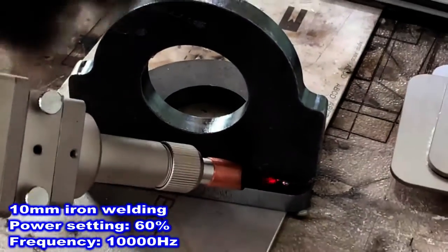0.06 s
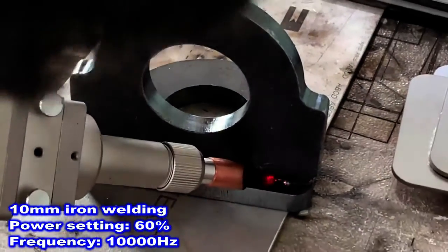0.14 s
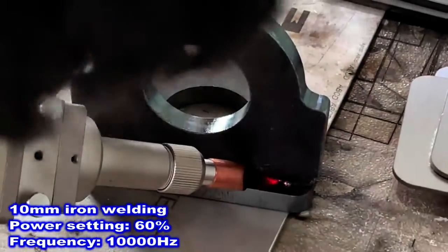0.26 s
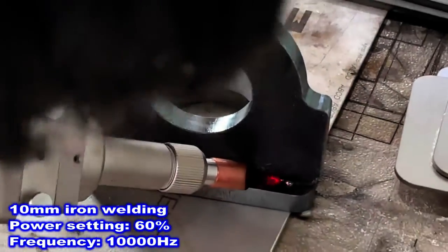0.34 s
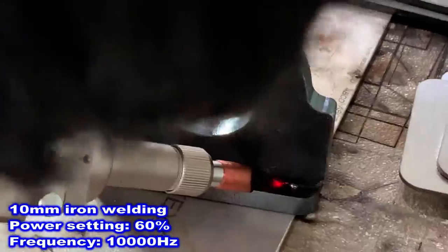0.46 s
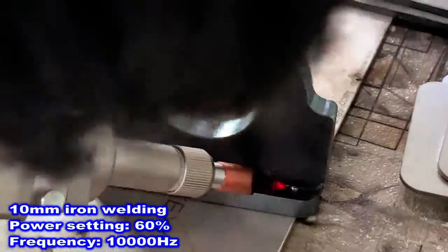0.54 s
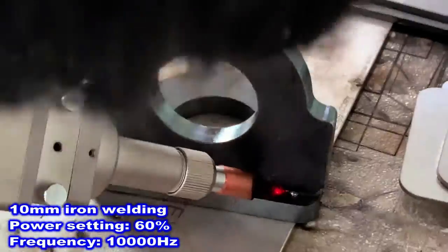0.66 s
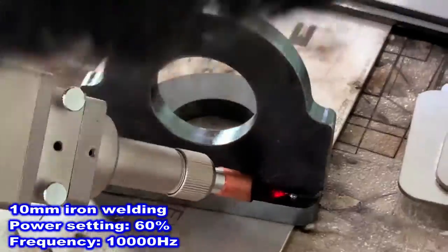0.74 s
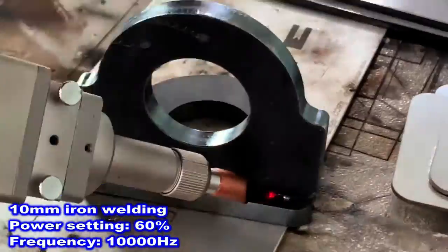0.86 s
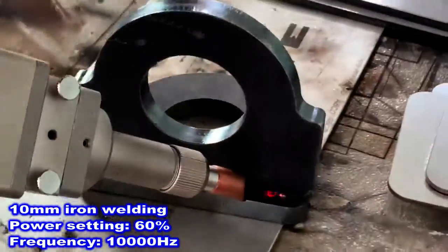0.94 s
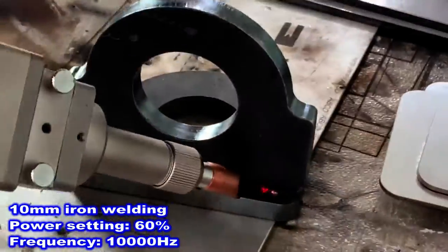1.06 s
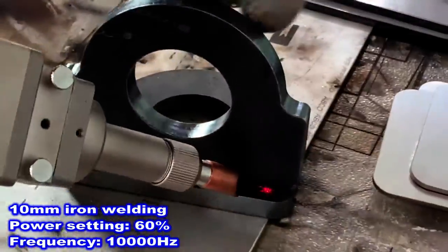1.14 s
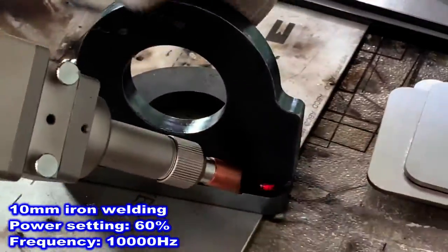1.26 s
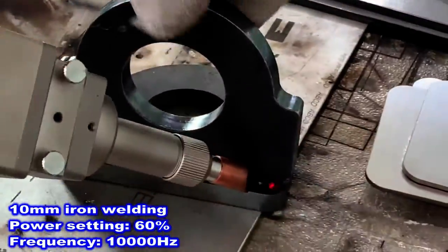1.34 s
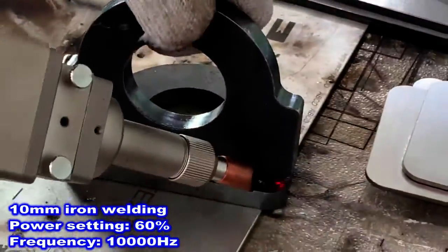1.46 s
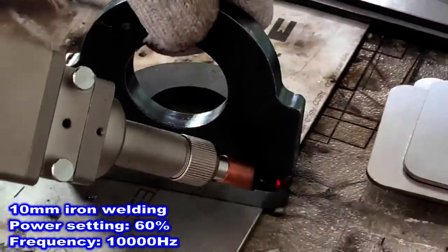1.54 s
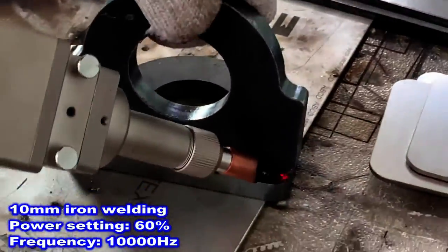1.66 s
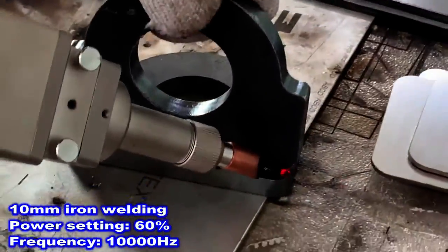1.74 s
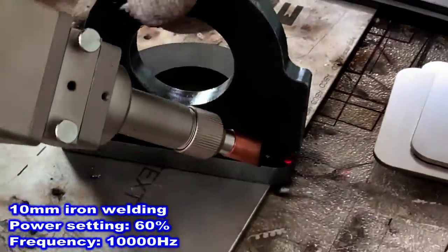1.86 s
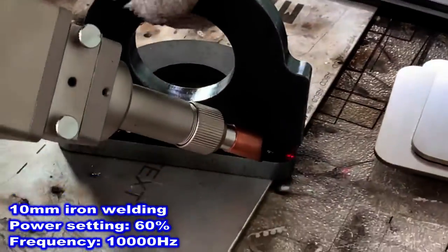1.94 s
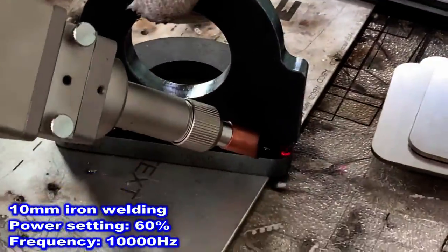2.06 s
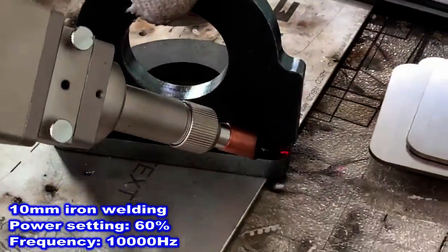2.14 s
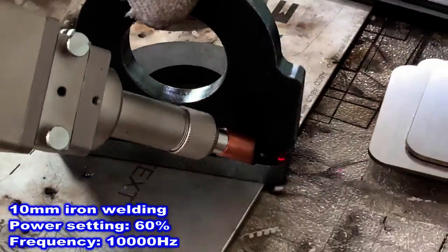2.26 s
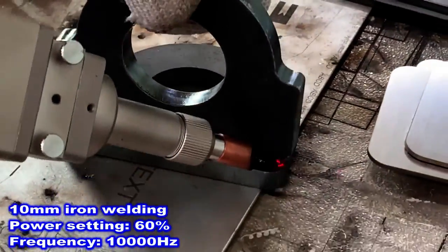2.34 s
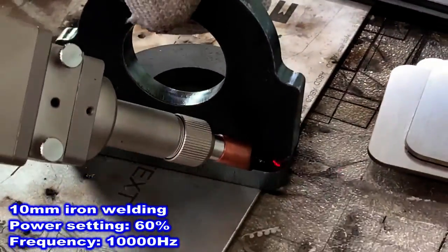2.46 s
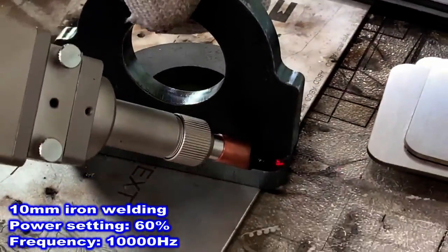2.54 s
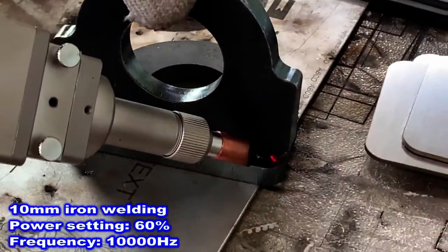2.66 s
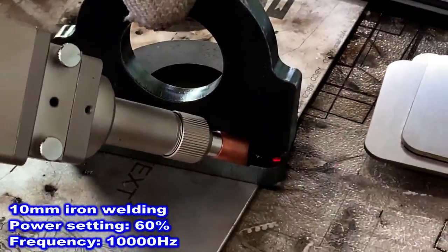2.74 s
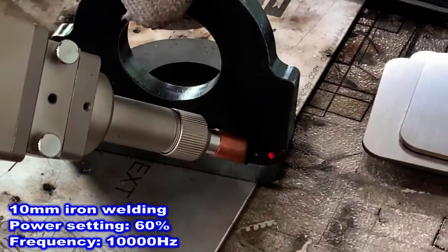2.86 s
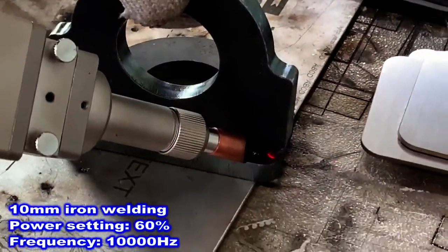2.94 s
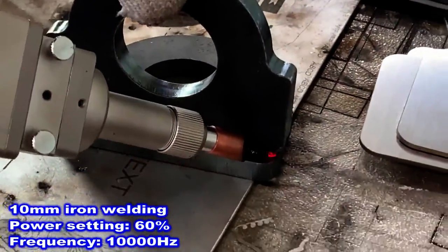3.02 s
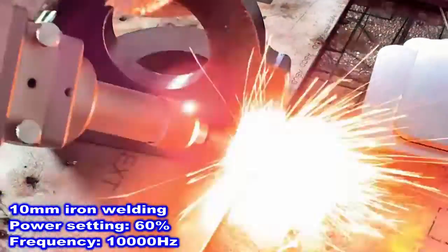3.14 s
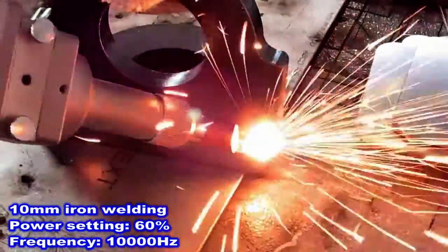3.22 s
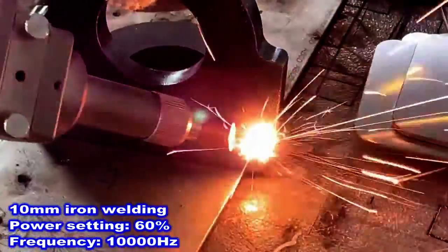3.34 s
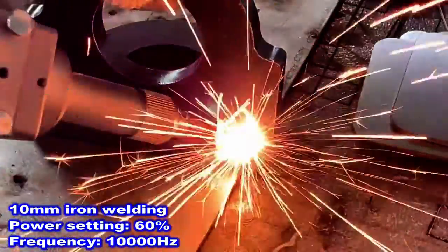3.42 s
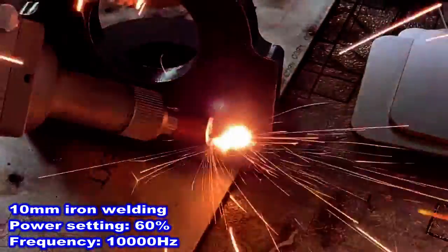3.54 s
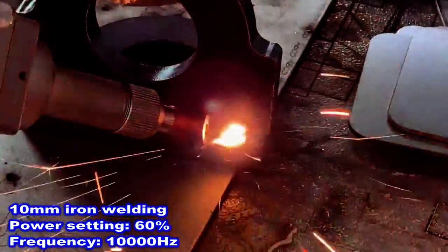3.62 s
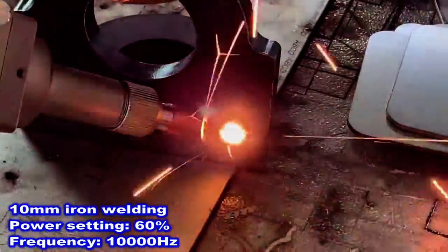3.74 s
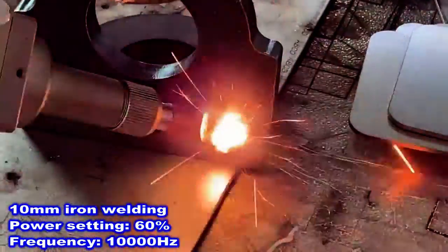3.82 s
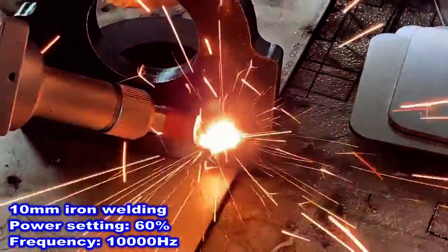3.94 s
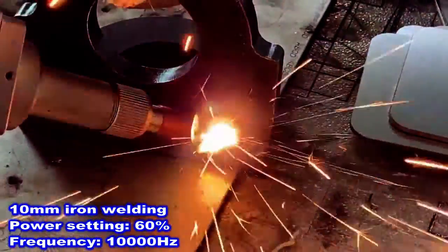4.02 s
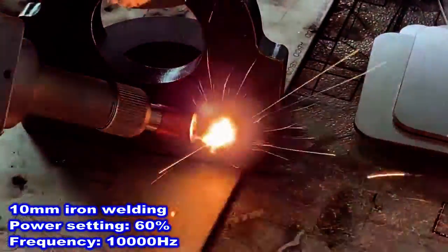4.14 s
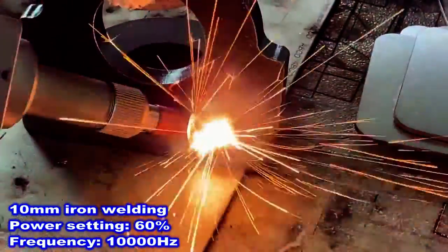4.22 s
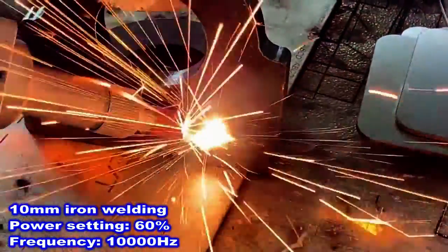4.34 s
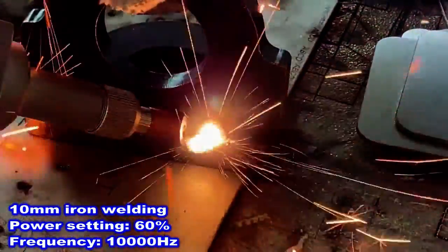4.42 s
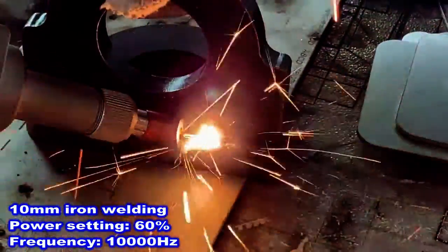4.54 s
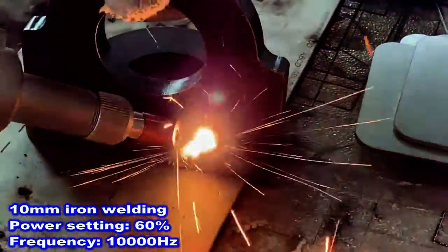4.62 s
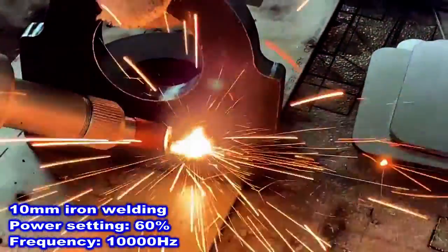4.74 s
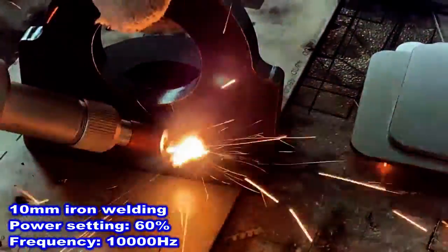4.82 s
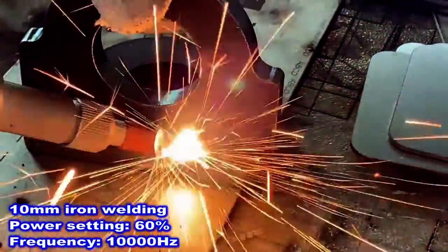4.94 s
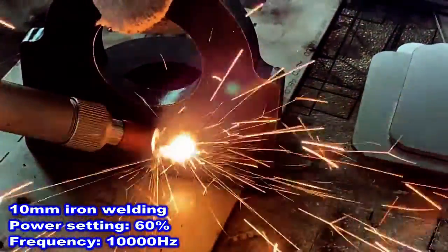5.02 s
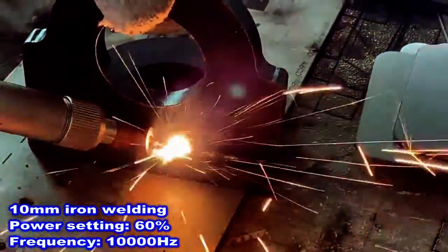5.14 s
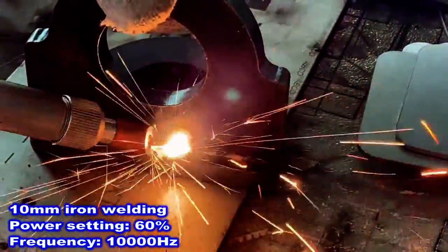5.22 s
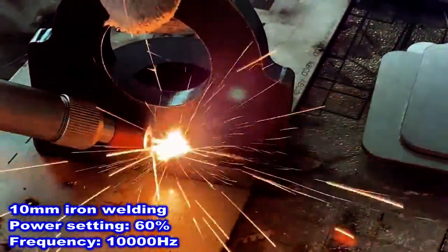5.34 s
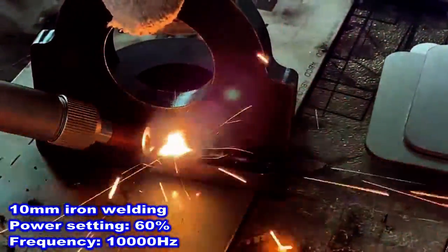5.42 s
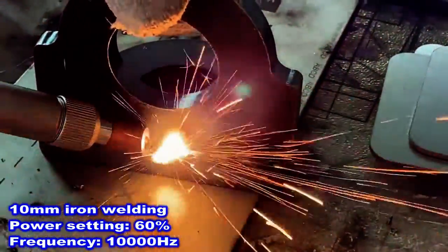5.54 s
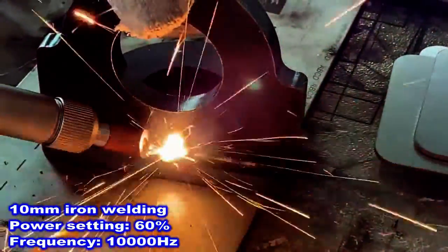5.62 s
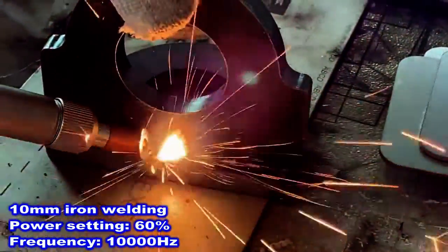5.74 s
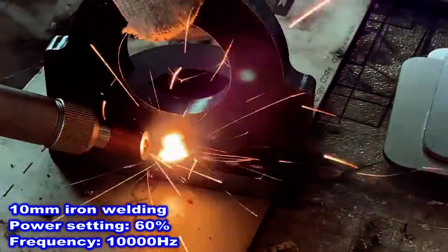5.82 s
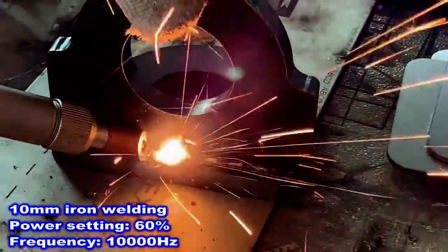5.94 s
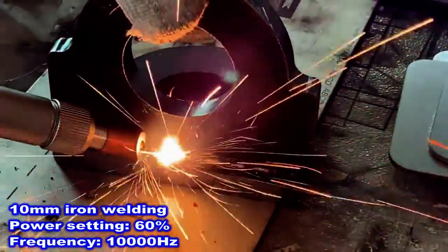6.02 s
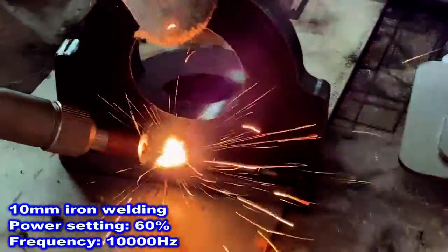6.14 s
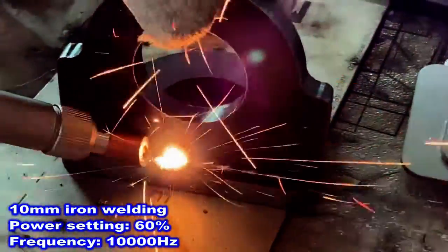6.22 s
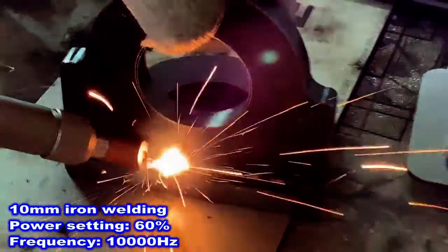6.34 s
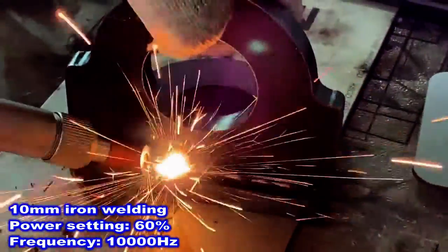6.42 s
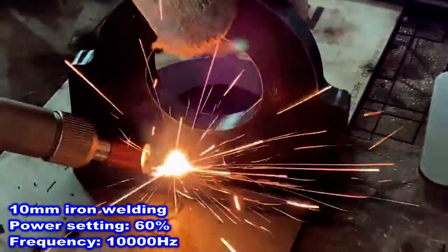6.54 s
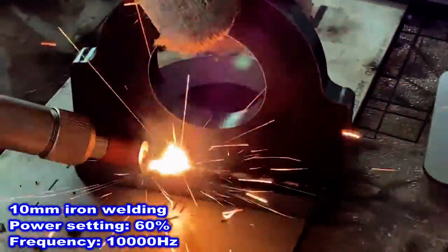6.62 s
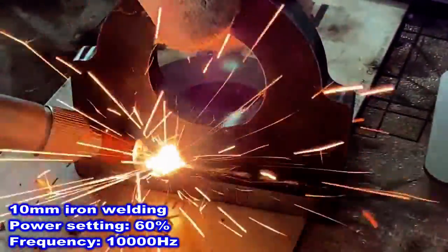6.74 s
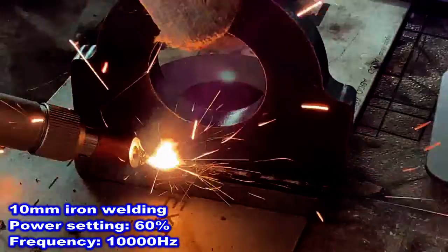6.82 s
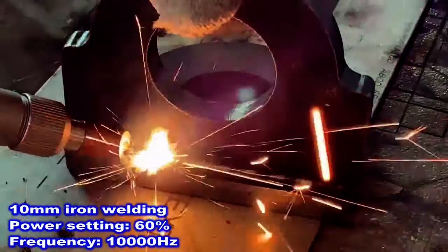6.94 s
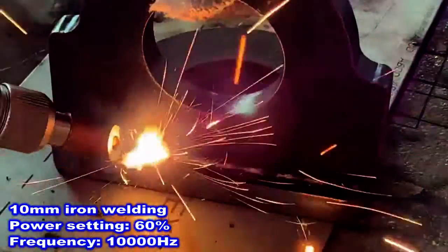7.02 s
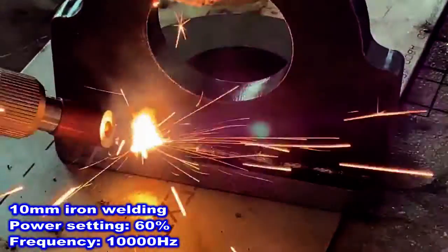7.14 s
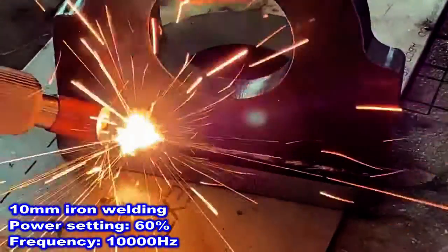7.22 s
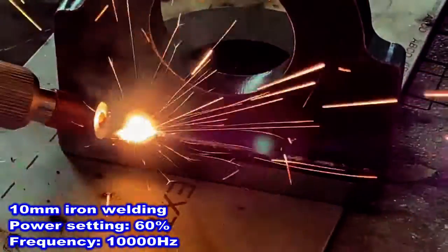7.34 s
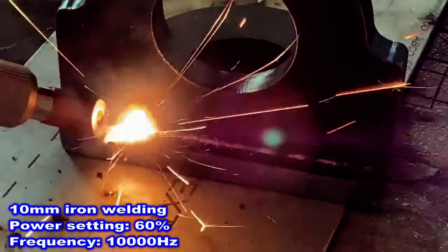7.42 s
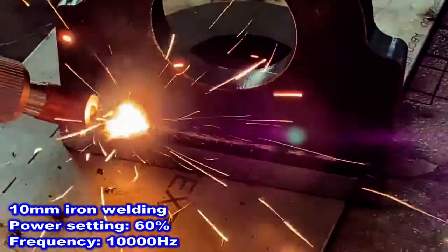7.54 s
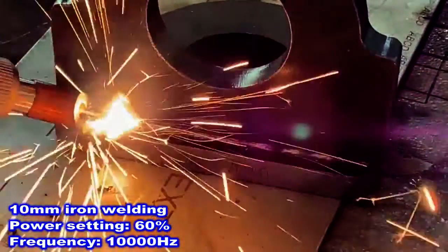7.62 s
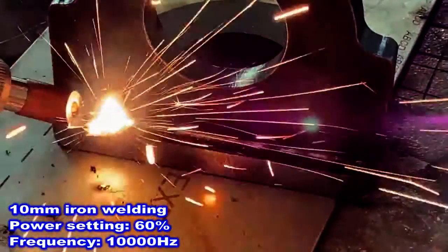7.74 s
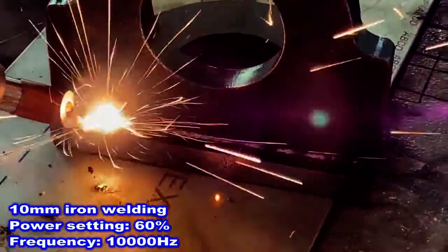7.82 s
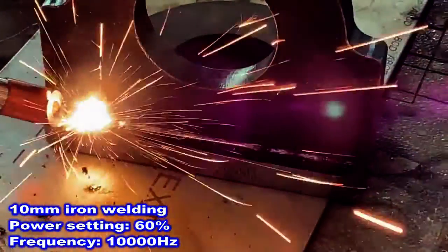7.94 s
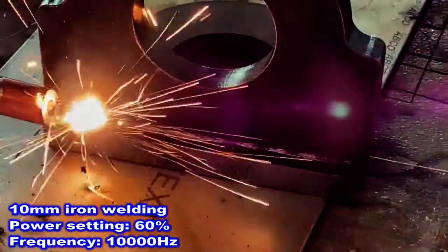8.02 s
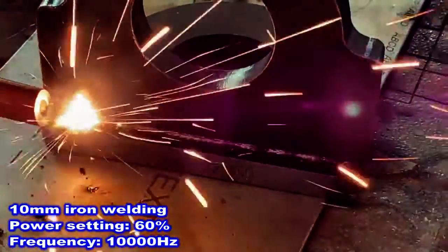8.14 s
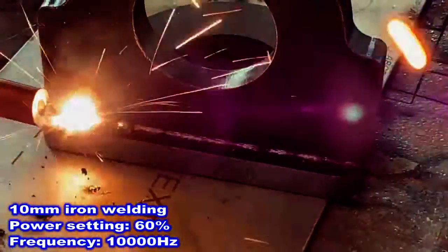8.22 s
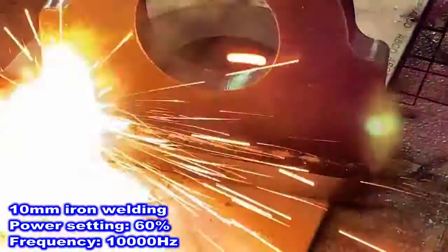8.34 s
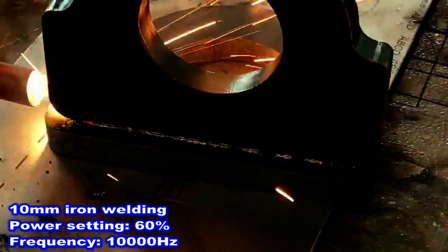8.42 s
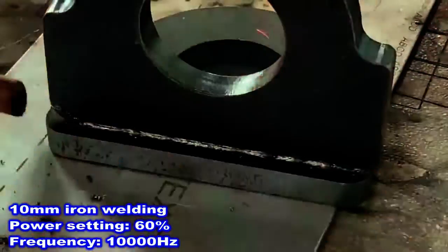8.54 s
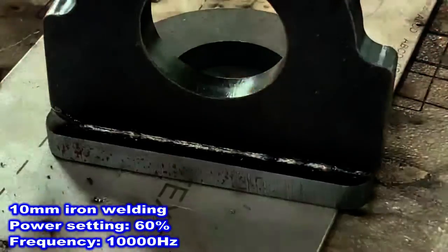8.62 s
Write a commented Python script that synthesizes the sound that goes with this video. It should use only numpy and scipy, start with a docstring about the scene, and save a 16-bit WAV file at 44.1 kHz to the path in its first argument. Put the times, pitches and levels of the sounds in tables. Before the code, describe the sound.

Close to the torch in a workshop, low fan roar and mains hum run while torch and iron tick, knock and rub. A bright gas puff opens, then a sharp crack starts a loud, piercing, constant-pitch whine with rough buzzing flutter, dense hiss and crackling sparks. Spatter sizzles in bursts, stronger towards the end. The whine stops quickly, leaving gas hiss and faint hum until the valve clicks shut.

```python
"""A workshop, two microphone ports close to a handheld laser welder running a seam along thick iron.
Fans and mains hum first; torch and work tick and rub, then shielding gas opens just before the strike.
The pulsed beam makes the vapour sing on three harmonics, built from tones with side tones and flutter.
The swinging spot beats tone and hiss alike; hiss, whistles, spatter and sparks are shaped noise.
At release the whine dies away and the gas flows on until its valve shuts."""
import sys
import numpy as np
from scipy import signal
from scipy.fft import rfft, irfft, next_fast_len
from scipy.io import wavfile

SR = 44100
rng = np.random.default_rng(int(sys.argv[2]) if len(sys.argv) > 2 else 0)


def put_to_file(sound):
    """Save the sound as 16-bit audio at rate SR, in the file named by the first command-line argument."""
    columns = np.atleast_2d(sound).T  # one column per channel
    safe = np.clip(columns, -1, 1)
    whole_steps = np.round(safe * 32767)
    wavfile.write(sys.argv[1], SR, whole_steps.astype(np.int16))


N = 382347
T = np.arange(N) / SR   # s

PULSE_HZ, SWING_HZ = 3500.16, 84.4   # beam pulses, swings of the spot
STRIKE_S, RELEASE_S = 3.246, 8.438   # beam on, beam off
CUTOFF_HZ = 16400


def amp(db):
    """dB to gain."""
    return np.exp(np.asarray(db) * (np.log(10) / 20))


def rms_one(x):
    """Scale to unit rms."""
    return x / np.sqrt(np.mean(np.abs(x) ** 2) + 1e-20)


def in_time(rows, **outside):
    """Columns of a curve table, one value per sample."""
    s, *columns = np.transpose(rows)
    return [np.interp(T, s, c, **outside) for c in columns]


def after(s):
    """Seconds since a moment, zero before it."""
    return np.maximum(T - s, 0)


def released(amount, edge_s):
    """Ramp from zero to an amount as the beam goes off."""
    return amount * np.clip(after(RELEASE_S) / edge_s, 0, 1)


def beam_on():
    """1 from strike to release, with millisecond edges."""
    return np.clip((T - STRIKE_S) / 0.0028, 0, 1) * np.clip((RELEASE_S - T) / 0.016, 0, 1)


def strokes(rows):
    """Gain of swells that climb to a peak and fall from it by 10 dB per rise or fall time."""
    gain = 0
    for s, db, rise, fall in rows:
        times_away = np.where(T < s, (s - T) / abs(rise), (T - s) / abs(fall))
        gain = gain + amp(db - 10 * times_away)
    return gain


def drift(rate_hz):
    """Slow chance of spread 1: noise at every 20th sample through a double one-pole."""
    r = np.exp(-40 * np.pi * rate_hz / SR)
    grain = rng.standard_normal(N // 20 + 3002)
    slow = signal.lfilter([1], [1, -2 * r, r * r], grain)[3000:]   # settled part
    return np.interp(np.arange(N) / 20, np.arange(len(slow)), rms_one(slow))


def complex_drift(rate_hz):
    """Slow chance in level and phase: two independent drifts a quarter cycle apart."""
    return drift(rate_hz) + 1j * drift(rate_hz)


def coloured(spectrum, patchy_db, patch_hz, low_hz, count):
    """Noise of a given spectrum in bands that flicker partly together, more in the treble; rms 1."""
    size = next_fast_len(N)
    hz = np.maximum(np.arange(size // 2 + 1) * SR / size, 1)
    point_hz, point_db = np.transpose(spectrum)
    colour = amp(np.interp(np.log(hz), np.log(point_hz), point_db))
    noise = rfft(rng.standard_normal(size)) * colour
    # overlapping triangular bands, evenly spaced in log frequency
    place = np.clip(count * np.log(hz / low_hz) / np.log(CUTOFF_HZ / low_hz), 0, count)
    out, together = 0, drift(patch_hz)
    for centre in range(count + 1):
        band = np.clip(1 - np.abs(place - centre), 0, 1)
        depth_db = patchy_db * (0.98 + 1.66 * np.square(centre / count))
        flicker = amp(depth_db * (0.43 * together + drift(patch_hz)))
        out = out + irfft(noise * band, size)[:N] * flicker
    return rms_one(out)


def resonate(x, hz, width_hz):
    """Two-pole resonance with gain 1 on top."""
    r = np.exp(-np.pi * width_hz / SR)
    top = [(1 - r * r) / 2, 0, (r * r - 1) / 2]
    return signal.lfilter(top, [1, -2 * r * np.cos(2 * np.pi * hz / SR), r * r], x)


def band_pass(x, order, low_hz, high_hz):
    """Keep what lies between two frequencies."""
    return signal.sosfilt(signal.butter(order, [low_hz, high_hz], "band", fs=SR, output="sos"), x)


def ports(mid, side):
    """Left and right port from sum and difference."""
    return np.array([mid + side, mid - side])


# fan roar, sum and difference of the ports: (frequency [Hz], relative level per Hz [dB])
SHOP_MID = [(15, -36), (28, -8), (45, -7), (58, 3.5), (80, -5), (125, -9), (250, -13.5), (310, -12.5),
            (420, -19), (690, -25.5), (800, -27), (950, -31.5), (1250, -32.5), (1700, -40), (2600, -43),
            (4700, -51.5), (5500, -60), (9000, -67.5), (11500, -70), (13000, -102)]
SHOP_SIDE = [(12, -62), (20, -17), (91, 5), (130, -7.5), (776, -14.5), (6090, -39.5), (7160, -57),
             (10800, -58), (13000, -101)]
# mains hum: (frequency [Hz], level before wavering, relative to the workshop [dB])
MAINS = [(100, -0.5), (200, -13.5), (300, -11.5)]
SHOP_DB, SHOP_NOISE_DB, SHOP_SIDE_DB = -31, 2, -11   # workshop; roar within it; difference within the roar
SHOP_PAN_DB = -2.2   # left minus right
SINK_DB, SINK_S, RECOVER_DB = 17, 0.11, 8.5   # sinks once the beam is on, partly returns at release


def workshop():
    """Fan roar is patchy coloured noise, mains hum wavering sines; both stronger at the right port."""
    mid, side = [coloured(c, patchy_db=.8, patch_hz=10, low_hz=30, count=10) for c in (SHOP_MID, SHOP_SIDE)]
    roar = ports(mid, amp(SHOP_SIDE_DB) * side)
    hum = 0
    for hz, db in MAINS:
        tone = np.cos(2 * np.pi * hz * T + 0.5 * drift(3.7))
        hum = hum + np.sqrt(2) * amp(db + 1.2 * drift(3.6)) * tone
    sink_db = SINK_DB * (1 - np.exp(-after(STRIKE_S) / SINK_S))
    level_db = SHOP_DB - sink_db + released(RECOVER_DB, 0.026)
    pan = amp([[SHOP_PAN_DB / 2], [-SHOP_PAN_DB / 2]])
    return amp(level_db) * (amp(SHOP_NOISE_DB) * roar + hum) * pan


# handling of torch and work, and the crack of the strike:
# (time [s], peak [dB], lowest frequency [Hz], highest frequency [Hz], time to fall 60 dB before filtering [s])
TICKS = [(0.743, -28, 250, 8500, 0.013), (0.762, -32, 300, 9500, 0.012), (0.794, -38, 500, 3000, .02),
         (2.34, -31, 600, 1500, .04), (2.448, -23, 330, 930, 0.064), (2.756, -30, 1500, 8400, 0.014),
         (2.969, -31.5, 2000, 8360, 0.025), (3.246, -16.5, 1200, 14300, 0.012),
         (8.579, -35, 1500, 8000, 0.037)]
TICK_SNAP = 5.5   # first contact of a tick relative to the noise that follows


def ticks():
    """Hard contacts: one sharp sample and a dying noise burst, band-limited and softened in the treble."""
    out, length = np.zeros((2, N)), 4000
    for s, db, low_hz, high_hz, t60 in TICKS:
        common = rng.standard_normal(length)
        burst = (common + 2.1 * rng.standard_normal((2, length))) * amp(-60 * T[:length] / t60)
        burst[:, 0] = TICK_SNAP
        burst = band_pass(burst, 3, low_hz, high_hz)
        burst = signal.lfilter([1], [1, -.95], burst)   # softer towards the treble
        start = round(s * SR)
        out[:, start:start + length] += amp(db) * burst / np.abs(burst).max()
    return out


# glove slides on iron: (time of peak [s], level [dB], rise per 10 dB [s], fall per 10 dB [s])
RUBS = [(.84, -59, .08, 0.11), (1.97, -51, 0.15, 0.54), (2.36, -35.5, 0.016, 0.027)]
# dull low swells around the end of the seam, same columns
SWELLS = [(8.27, -33.5, 0.025, 0.31), (8.4, -57, 0.068, 0.074), (8.545, -42.5, 0.062, 0.13)]
RUB_BRIGHT_DB = -16   # gain of the rub's bright grain beside its body
SQUEAK_HZ = 2590


def handling():
    """Ticks, and rubs, low swells and a squeak made of resonant noise under rising and falling strokes."""
    skin = rng.standard_normal((2, N))
    grain = resonate(resonate(skin, 7000, 2300), 7000, 2300)
    rub = rms_one(resonate(skin, 1100, 1000) + amp(RUB_BRIGHT_DB) * grain)
    rub = signal.sosfilt(signal.butter(8, 9500, fs=SR, output="sos"), rub) * amp(2.2 * drift(40))
    swell = rms_one(resonate(resonate(rng.standard_normal(N), 336, 220), 270, 520))
    # a faint squeak as the torch is set down
    squeak = strokes([(2.76, -57, .05, .13)]) * rms_one(resonate(rng.standard_normal(N), SQUEAK_HZ, 30))
    return ticks() + strokes(RUBS) * rub + strokes(SWELLS) * swell + squeak


# steady gas flow: (frequency [Hz], relative level per Hz [dB])
GAS = [(600, -10), (1500, 5), (3100, 3), (4800, -13), (6300, -4), (9000, -4), (9800, -9), (10800, 3),
       (11800, -32), (14000, -45)]
# first puff of the valve: (frequency [Hz], relative level per Hz [dB])
PUFF = [(1500, -8), (2200, -5), (3300, -18), (4000, 5), (7000, -11), (10400, 5), (12500, -19), (14300, -26),
        (15200, -55)]
# its course: (time of peak [s], level [dB], rise per 10 dB [s], fall per 10 dB [s])
PUFF_STROKE = [(3.068, -46, 0.0041, 0.034)]
GAS_OPEN_S, GAS_DB, GAS_RISE_S = 3.055, -42.5, 0.044


def gas_lead():
    """Shielding gas opens with a bright puff a moment before the beam, then flows evenly as noise."""
    left, right = [coloured(GAS, patchy_db=1.5, patch_hz=11, low_hz=1000, count=6) for _ in range(2)]
    flow = amp(GAS_DB) * np.clip(after(GAS_OPEN_S) / GAS_RISE_S, 0, 1) * np.array([left, right])
    puff = strokes(PUFF_STROKE) * coloured(PUFF, patchy_db=1, patch_hz=20, low_hz=1000, count=2)
    return (T < STRIKE_S) * (flow + puff)


# side tones of the swing, a row per harmonic, columns at -3, -2, -1, +1, +2, +3 swing rates:
# (level against the harmonic before a 1.5 dB cut and wavering [dB], six times)
SWING_SIDES = [(-24, -12, -4, -9, -18, -17), (-22, -14, -12, -15, -16, -23), (-20, -18, -19, -10, -11, -24)]


def swing_sides(k):
    """The swinging spot modulates a harmonic, which puts tones at multiples of the swing rate beside it."""
    sides = 0
    for order, side_db in zip((-3, -2, -1, 1, 2, 3), SWING_SIDES[k]):
        turn = .5 * (k + 1) * drift(5) + 2 * np.pi * order * SWING_HZ * T
        sides = sides + amp(side_db - 1.5 + 3 * drift(8)) * np.exp(1j * turn)
    return sides


# vapour flutter, a row per harmonic:
# (level against the harmonic [dB], rate [Hz], share of power common to both ports [0-1])
FLUTTER = [(-13, 70, 0.95), (-12, 60, 0.8), (-11, 60, .9)]


def vapour_flutter(k):
    """Unsteady vapour blurs a harmonic with narrow noise, partly common to the ports."""
    flutter_db, rate_hz, share = FLUTTER[k]
    common, left, right = [complex_drift(rate_hz) for _ in range(3)]
    mixed = np.sqrt(share) * common + np.sqrt(1 - share) * np.array([left, right])
    return amp(flutter_db) * mixed / np.sqrt(2)


DIP_S = 0.0077   # edge of a dip


def dipped_lead(lead, dips):
    """During each dip the phase lead of left over right moves over to the angle of that dip."""
    for s, length, angle in dips:
        inside = np.clip(np.minimum(T - s, s + length - T) / DIP_S + .5, 0, 1)
        lead = lead + inside * (angle - lead)
    return lead


# whine: (time [s], level of harmonics 1, 2, 3 before wavering, flicker and tail [dB])
WHINE = [(3.26, -27.5, -33.5, -27.5), (3.32, -27.0, -31.0, -25.0), (3.45, -25.0, -28.5, -23.5),
         (3.64, -26.5, -26.5, -23.5), (3.83, -30.0, -28.0, -24.0), (4.02, -27.0, -26.5, -22.5),
         (4.21, -29.0, -28.5, -23.5), (4.4, -27.0, -28.5, -24.0), (4.59, -29.5, -30.0, -24.5),
         (4.78, -29.0, -29.5, -24.0), (4.97, -28.5, -28.5, -21.5), (5.16, -27.5, -30.0, -21.5),
         (5.35, -27.5, -29.0, -21.0), (5.54, -27.0, -29.0, -21.0), (5.73, -28.5, -29.5, -21.0),
         (5.92, -27.5, -29.0, -21.5), (6.11, -27.0, -28.5, -21.0), (6.3, -28.5, -26.5, -22.5),
         (6.49, -31.0, -25.0, -24.5), (6.68, -29.5, -22.5, -26.0), (6.87, -27.5, -22.5, -28.5),
         (7.06, -28.0, -24.0, -31.0), (7.25, -27.5, -26.5, -26.0), (7.44, -30.5, -26.0, -26.0),
         (7.63, -29.0, -25.5, -23.5), (7.82, -27.5, -26.0, -22.5), (8.01, -27.0, -26.0, -20.5),
         (8.2, -27.0, -28.5, -22.5), (8.39, -26.0, -28.0, -24.0)]
# where it sits as the torch travels:
# (time [s], left minus right of harmonics 1, 2 [dB], left lead of harmonics 1, 2 outside dips [rad])
PLACE = [(3.3, -4, -1, 2.6, 0.45), (3.85, -0.5, 0.5, 2.37, 0.48), (4.2, -3.7, -1, 2.94, 0.49),
         (4.6, 2.5, -1, 3.1, 0.9), (5.0, 2, -4, 3.25, 0.86), (5.2, 3, -4, 3, .05),
         (5.55, 2.5, -7.5, 3.93, .05), (5.95, -4, -5.5, 4.37, 0.028), (6.35, -4, -4, 3.85, .03),
         (6.52, 6, -3.5, 4.24, .03), (6.7, -0.5, -2.5, 3.65, 0.033), (7.05, 1, -3, 3.44, .05),
         (7.25, 0.5, 0, 3.75, 0.54), (7.5, 3.5, 2.5, 4.5, .5), (7.7, -0.5, 4, 5.2, .5),
         (8.0, -2.5, 0, 4.6, .5), (8.42, -3.5, -2, 5.2, .4)]
# brief moments when left and right swing towards opposite phase and the tone thins at the centre,
# second harmonic then third: (start [s], length [s], left lead [rad])
DIPS_2 = [(3.262, 0.015, 3.5), (3.328, 0.027, 2.7), (3.383, 0.025, 3.2), (3.724, 0.047, 3.1),
          (3.792, 0.062, 3.5), (3.908, 0.068, 3.7), (4.03, 0.035, 3.1), (4.119, 0.019, 3.6),
          (4.188, 0.028, 2.3), (4.26, 0.064, 2.9), (4.349, 0.024, 3.0), (4.416, 0.023, 3.0),
          (4.627, 0.027, 2.6), (4.67, 0.093, 2.8), (4.99, 0.071, 3.1), (5.093, 0.024, 3.0),
          (5.283, 0.026, 2.8), (5.317, 0.03, 2.8), (6.022, 0.05, 3.0), (6.248, 0.026, 2.7),
          (6.46, 0.044, 3.1), (7.072, 0.13, 3.1), (7.232, 0.018, 3.3), (7.277, 0.02, 3.3),
          (7.349, 0.51, 3.1), (7.884, 0.49, 3.1)]
DIPS_3 = [(3.656, 0.07, 1.9), (3.744, 0.027, 2.9), (3.815, 0.026, 2.8), (3.86, 0.026, 3.0),
          (4.186, 0.028, 2.9), (4.259, 0.023, 2.8), (4.675, 0.023, 2.8), (4.788, 0.025, 3.0),
          (4.863, 0.133, 1.9), (5.046, 0.025, 2.8), (5.092, 0.021, 2.9), (5.303, 0.023, 2.8),
          (5.442, 0.024, 2.8), (5.837, 0.024, 2.9), (5.976, 0.022, 2.8), (6.16, 0.022, 2.8),
          (6.229, 0.024, 3.0), (6.299, 0.026, 2.8), (6.557, 0.023, 3.1), (6.649, 0.022, 2.8),
          (6.743, 0.024, 2.8), (6.928, 0.092, 3.1), (7.136, 0.025, 2.8), (7.254, 0.022, 2.7),
          (7.321, 0.024, 2.8), (7.438, 0.023, 2.9), (7.509, 0.019, 2.7), (7.693, 0.027, 2.8),
          (7.739, 0.025, 2.8), (7.996, 0.024, 2.9), (8.112, 0.023, 2.8), (8.181, 0.023, 2.8)]
# how far each harmonic's side tones lean to opposite phase: (lean of harmonics 1, 2, 3 [0-1])
SIDES_APART = (.7, 0, 0)
THIRD_LEAD = 0.06   # rad left leads on the third harmonic outside dips; left and right are level
WAVER_DB, WAVER_HZ = (.8, .8, .8), 11.8   # each harmonic swells and sinks on its own
FLICKER_DB, FLICKER_HZ = (2.34, 1.6, 1.82), 25.2   # all three flicker together
TAIL_DROP_DB, TAIL_DB_PER_S = (7, -2, 8.5), 104   # step down at release (negative: up), then decay
TAIL_BEAT_HZ, TAIL_BEAT_SHARE = 12, .6   # in the tail the echoes beat against each other
THIN_HZ, THIN_DB = 14400.5, -20   # thin high tone that follows the third harmonic, dB against it
THIN_TAIL_DB_PER_S = 120   # decay on top of the third harmonic's own


def whine():
    """Pulsed vapour sings: each harmonic is a tone with side tones and flutter, placed by level and phase."""
    out, struck, on = 0, np.clip((T - STRIKE_S) / 0.0022, 0, 1), beam_on()
    pan_1, pan_2, lead_1, lead_2 = in_time(PLACE)
    pans = (pan_1, pan_2, 0)
    leads = (lead_1, dipped_lead(lead_2, DIPS_2), dipped_lead(THIRD_LEAD, DIPS_3))
    flicker = drift(FLICKER_HZ)
    for k, level_db in enumerate(in_time(WHINE)):
        lean = .5j * SIDES_APART[k] * (np.pi - leads[k])
        sides = on * swing_sides(k) * np.exp([lean, -lean])
        echoes = np.array([complex_drift(TAIL_BEAT_HZ) for _ in range(2)]) / np.sqrt(2)
        tail_beat = released(TAIL_BEAT_SHARE, 0.012) * (echoes - .5)
        shape = 1 + tail_beat + vapour_flutter(k) + sides
        tail_db = released(TAIL_DROP_DB[k], 0.0039) + TAIL_DB_PER_S * after(RELEASE_S)
        unsteady_db = WAVER_DB[k] * drift(WAVER_HZ) + FLICKER_DB[k] * flicker
        level = np.sqrt(2) * struck * amp(level_db + unsteady_db - tail_db)
        half = pans[k] / 40 * np.log(10) + .5j * leads[k]   # half the level and phase gap to each side
        envelope = level * shape * np.exp([half, -half])
        out = out + (envelope * np.exp(2j * np.pi * (k + 1) * PULSE_HZ * T)).real
    # the envelope left over is the third harmonic's
    thin = (envelope * np.exp(2j * np.pi * THIN_HZ * T)).real
    return out + amp(THIN_DB - THIN_TAIL_DB_PER_S * after(RELEASE_S)) * thin


# hiss reaches one port first:
# (frequency [Hz], part of the sum turned a quarter cycle into the difference [signed ratio])
LEAN = [(1000, 0), (1400, 0.43), (1800, 0.71), (2300, .3), (3000, 0), (4200, -.7), (5000, -0.32),
        (6000, -.1), (6500, 0)]


def quarter_turn(x):
    """The part of a sound that leads by a quarter cycle, weighted over frequency."""
    size = next_fast_len(N)
    lean_hz, part = np.transpose(LEAN)
    weight = np.interp(np.arange(size // 2 + 1) * SR / size, lean_hz, part)
    return irfft(1j * weight * rfft(x, size), size)[:N]


# hiss of gas and melt: (time [s], level before release losses [dB], gain of treble above 5 kHz [dB])
HISS = [(3.25, -28.5, -9), (3.5, -24.5, -6), (3.75, -28, 1), (4.7, -29, 5), (5.2, -28.5, 0.5),
        (5.7, -28.5, 3.5), (6.2, -29, -14), (7.2, -28.5, -1), (8.43, -28, -1.5)]
# sum of the ports at the start and at the end of the seam, and their difference:
# (frequency [Hz], relative level per Hz [dB])
HISS_START = [(90, 7), (140, 2), (1150, 1), (1450, -7), (1850, -2), (2100, -18.5), (2350, -5.5),
              (2700, -46), (3100, -62), (3850, -59), (4500, -51), (5350, -27), (5800, -3), (6300, -1.5),
              (7600, -5), (9200, 4.5), (9700, -12.5), (10300, 8.5), (11300, -44), (12200, -67), (14300, -8),
              (15700, -52)]
HISS_END = [(90, 0.5), (140, 3), (1150, -2), (1450, -11), (1850, -3), (2100, -29.5), (2350, -8.5),
            (2700, -23.5), (3050, 0.5), (3300, -7.5), (3850, -5), (4500, -1.5), (5200, -3.5), (6300, 2),
            (8000, -7), (8900, -3), (9700, -25), (10300, 9), (11300, -54), (12200, -72), (14300, -21),
            (15700, -34)]
HISS_SIDE = [(130, -23), (400, -28), (1200, -19.5), (1850, -3.5), (2600, -4.5), (3100, 0.5), (3850, -0.5),
             (4500, -6.5), (6300, -7.5), (7600, -13), (8700, -5.5), (9700, -5), (10300, -1.5), (11300, -26),
             (12400, -55), (14200, -21), (15700, -58)]
HISS_SIDE_DB = -2.5   # level of the difference beside the sum
TURN_S, TURN_POWER = (3.65, 7.42), 1.35   # the colour turns between these times, slowly at first
HISS_DROP_DB, GAS_FADE_DB_PER_S = 9, 2   # after release only gas flows
GAS_OFF_S, SHUT_DB_PER_S = 8.58, 246.5   # then the valve shuts


def jet():
    """Gas jet and boiling melt: noise whose colour turns along the seam, with a moving treble."""
    level_db, treble_db = in_time(HISS, left=-120)
    level_db = level_db - released(HISS_DROP_DB, 0.0046) - GAS_FADE_DB_PER_S * after(RELEASE_S)
    level_db = level_db - SHUT_DB_PER_S * after(GAS_OFF_S)
    turn = np.pi / 2 * np.interp(T, TURN_S, (0, 1)) ** TURN_POWER
    early, late = [coloured(c, patchy_db=2.1, patch_hz=16, low_hz=400, count=24) for c in (HISS_START, HISS_END)]
    mid = np.cos(turn) * early + np.sin(turn) * late
    side = coloured(HISS_SIDE, patchy_db=1, patch_hz=25, low_hz=402, count=12)
    air = ports(mid, quarter_turn(mid) + amp(HISS_SIDE_DB) * side)
    treble = signal.sosfilt(signal.butter(2, 5000, "high", fs=SR, output="sos"), air)
    return amp(level_db) * (air + (amp(treble_db) - 1) * treble)


# nozzle whistles:
# (frequency [Hz], width of each of two resonances [Hz], level before wavering and strength [dB])
NOZZLE = [(8600, 150, -75), (9050, 74, -38), (8990, 350, -55), (10410, 100, -43)]
# strength of whistles and strands: (time [s], gain [dB])
WHISTLE = [(3.25, 1), (8.5, -9)]


def nozzle_whistles():
    """Air noise rings in narrow resonances; the right channel weakens or turns over in the third's dips."""
    whistles = 0
    for hz, width_hz, db in NOZZLE:
        air = rng.standard_normal(N) + 0.48 * rng.standard_normal((2, N))
        ringing = rms_one(resonate(resonate(air, hz, width_hz), hz, width_hz))
        whistles = whistles + amp(db + 3.5 * drift(14)) * ringing
    right = np.cos(dipped_lead(0, DIPS_3))
    return beam_on() * amp(in_time(WHISTLE)[0]) * whistles * np.array([np.ones(N), right])


# spatter bursts: (time of peak [s], level [dB], rise per 10 dB [s], fall per 10 dB [s])
SPATTER = [(3.28, -32, .02, 0.026), (3.43, -25, 0.016, 0.025), (3.59, -38, .04, .02),
           (3.785, -41, .012, .012), (3.86, -29, 0.016, 0.013), (4.17, -41, 0.018, 0.022),
           (4.31, -36, .015, .015), (4.52, -29, .02, 0.012), (6.55, -35, 0.02, 0.021),
           (6.72, -32, .03, .03), (6.95, -30, 0.11, .06), (7.08, -25, 0.054, 0.03),
           (7.21, -22, 0.017, 0.025), (7.31, -43, .02, .015), (7.49, -26, 0.013, 0.019),
           (7.79, -24, 0.033, .015), (7.99, -49, .02, 0.014), (8.375, -34, 0.013, 0.018),
           (8.475, -49, 0.016, .015), (8.545, -51, .03, 0.023)]


def spatter():
    """Spatter sizzles in short strokes of bright, flickering noise, mostly alike at both ports."""
    air = rng.standard_normal(N) + .2 * rng.standard_normal((2, N))
    sizzle = rms_one(band_pass(air, 8, 10850, 11750) * amp(5 * drift(25)))
    return (T > STRIKE_S) * strokes(SPATTER) * sizzle


def hiss():
    """Jet, whistles and spatter together, their level beaten by the swing while the beam is on."""
    swing = 0.2 * np.cos(2 * np.pi * SWING_HZ * T) + 0.11 * np.cos(4 * np.pi * SWING_HZ * T)
    return (1 + beam_on() * swing) * (jet() + nozzle_whistles() + spatter())


# thin strands of sizzle: (frequency before wander [Hz], level before swing and strength [dB])
STRANDS = [(7450, -45), (7800, -45), (8150, -46), (8600, -45), (9400, -46), (10850, -49)]
STRAND_WANDER_HZ, STRAND_SWING_DB = 120, 8


def strands():
    """Narrow noises that wander in pitch and sound in short patches, unlike at the two ports."""
    out = 0
    for hz, db in STRANDS:
        air = np.array([complex_drift(60) for _ in range(2)])
        turn = 2 * np.pi * np.cumsum(hz + STRAND_WANDER_HZ * drift(3)) / SR
        patches_db = STRAND_SWING_DB * np.tanh(2 * drift(9))   # mostly fully up or fully down
        out = out + amp(db + patches_db) * (air * np.exp(1j * turn)).real
    return beam_on() * amp(in_time(WHISTLE)[0]) * out


# a narrow band of hiss around 4.2 to 4.6 kHz that drifts in pitch:
# (time [s], frequency [Hz], level before flutter [dB])
NARROW_HISS = [(3.25, 4230, -47), (3.46, 4230, -53), (3.49, 4230, -70), (3.5, 4570, -63), (3.53, 4570, -54),
               (4.0, 4600, -47), (4.5, 4500, -46.5), (5.27, 4460, -41.5), (5.7, 4430, -45),
               (6.2, 4380, -52)]
NARROW_HISS_RATE_HZ, NARROW_HISS_FLUTTER_DB = 90, 3


def narrow_hiss():
    """A narrow band of noise around a drifting pitch, alike at both ports."""
    hz, db = in_time(NARROW_HISS)
    air = complex_drift(NARROW_HISS_RATE_HZ)
    band = (air * np.exp(2j * np.pi * np.cumsum(hz) / SR)).real
    return amp(db + NARROW_HISS_FLUTTER_DB * drift(13.6)) * beam_on() * band


MEDIAN_SPARKS_PER_S, SPARK_DB = 400, -44


def sparks():
    """Droplets burst at random: tiny clicks of uneven size, bright, partly separate at each port."""
    born = rng.random(N) < MEDIAN_SPARKS_PER_S * amp(7 * drift(8)) / SR
    size = amp(4 * np.minimum(rng.exponential(1, N), 3))
    clicks = born * size * rng.choice([-1, 1], N)
    pair = clicks * amp(3 * rng.standard_normal((2, N))) + 1e-18
    return amp(SPARK_DB) * beam_on() * rms_one(band_pass(pair, 6, 5900, 9400))


# puffs of the swinging pool: (multiple of the swing rate [1], level before wavering [dB])
SWING_HUM = [(1, -37.5), (2, -48), (3, -50.5), (4, -55), (5, -50.5)]


def swing_hum():
    """Low tones at multiples of the swing rate, wavering with the pool."""
    tones = 0
    for k, db in SWING_HUM:
        tone = np.cos(2 * np.pi * k * SWING_HZ * T + .5 * drift(4))
        tones = tones + amp(db + 2 * drift(8)) * tone
    return np.sqrt(2) * beam_on() * np.clip((T - STRIKE_S) / 0.098, 0, 1) * tones


def scene():
    """All sources at the two ports."""
    before = workshop() + handling() + gas_lead()
    welding = whine() + hiss() + strands() + narrow_hiss() + sparks() + swing_hum()
    return before + welding


def record(dry):
    """The top is cut steeply, 70 dB down from the cutoff upward."""
    return signal.sosfilt(signal.cheby2(12, 70, CUTOFF_HZ, fs=SR, output="sos"), dry)


dry = scene()
out = record(dry)
put_to_file(out)
```